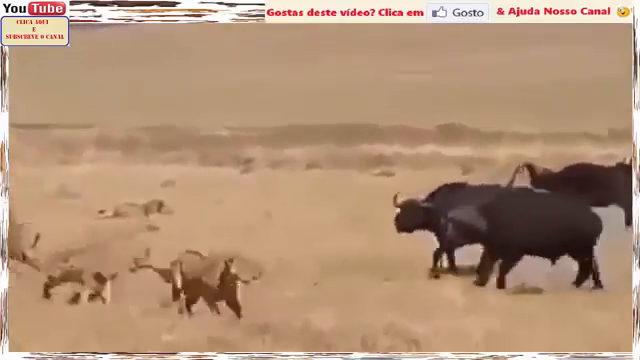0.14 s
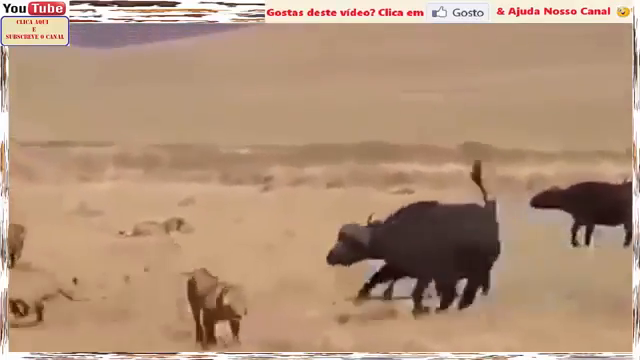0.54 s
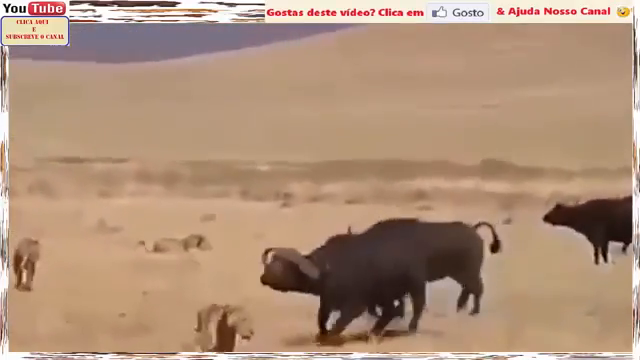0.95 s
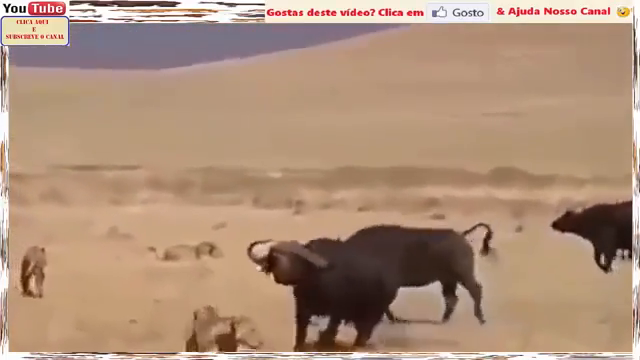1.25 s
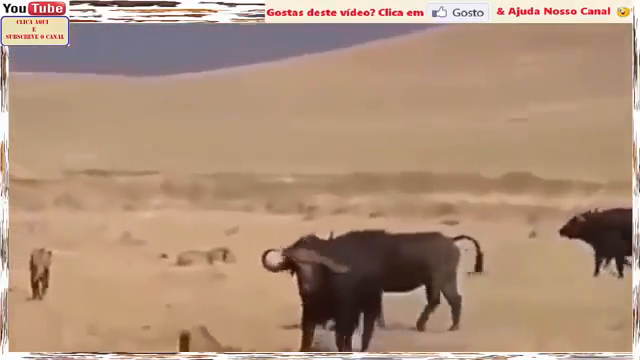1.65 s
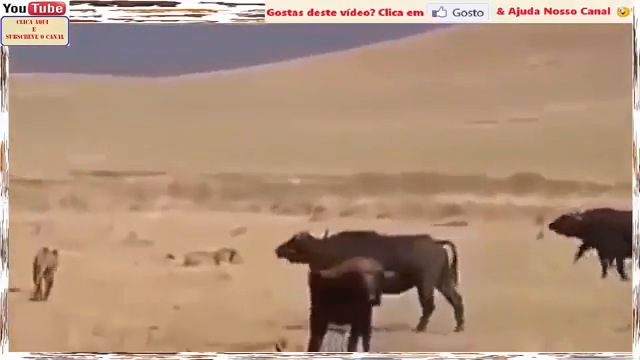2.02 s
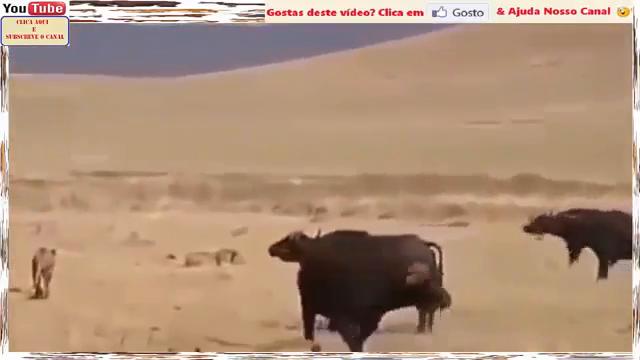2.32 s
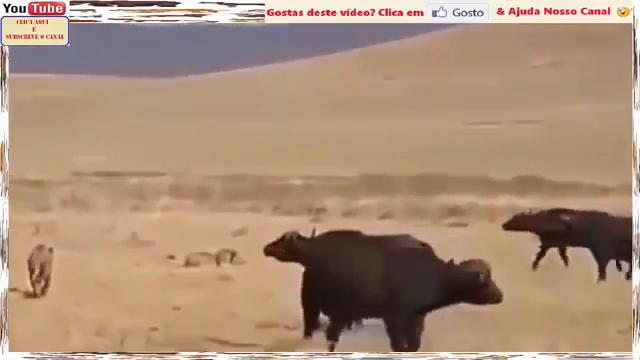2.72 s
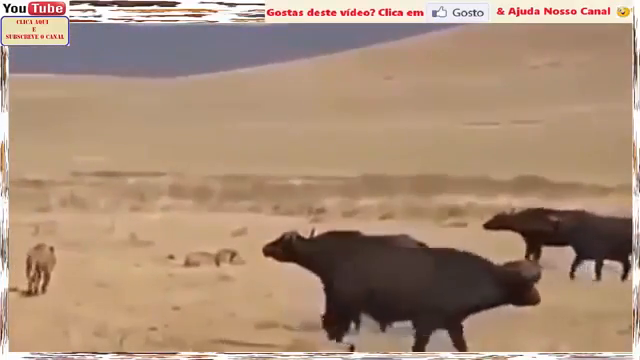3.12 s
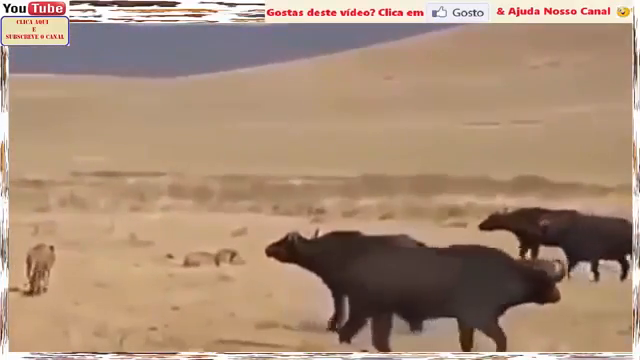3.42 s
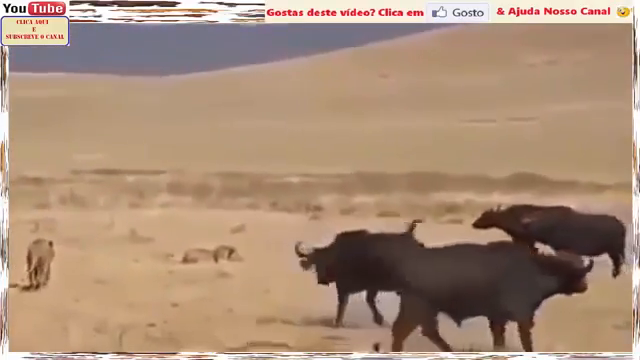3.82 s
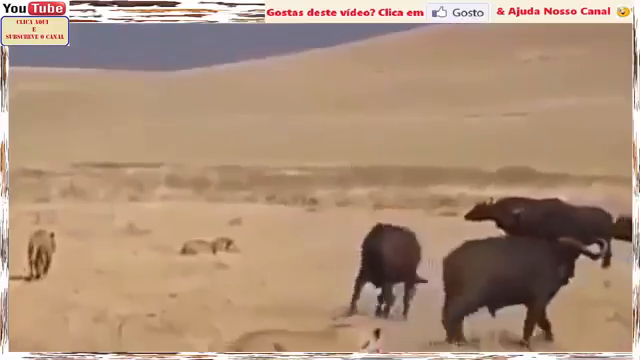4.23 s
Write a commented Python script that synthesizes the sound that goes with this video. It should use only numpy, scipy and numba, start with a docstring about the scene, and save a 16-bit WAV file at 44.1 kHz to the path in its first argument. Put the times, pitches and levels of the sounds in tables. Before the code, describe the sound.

A buffalo gives a long, hoarse low bellow with harsh rasps and a hollow knock, then a shorter, clearer call over rustling grass and hiss.

```python
"""Buffalo in dry grass on an open plain: a long hoarse low call, later a shorter clearer one.
Glottal pulses and breath ring in chest, throat, mouth and nose; harsh rasps and a hollow knock mix in.
Noise bands make the grass rustle, ground rumble, leg swishes and the hiss of the plain; hooves thud as
decaying sines. A small bird chirps twice and a far moan sags, both near sines; insects are thin noise bands.
"""
import sys
import numpy as np
from scipy import signal
from scipy.io import wavfile
from scipy.ndimage import uniform_filter1d
from numba import njit

SR = 44100
rng = np.random.default_rng(int(sys.argv[2]) if len(sys.argv) > 2 else 0)


def pcm_store(signal):
    """Save signal as 16-bit PCM."""
    levels = np.round(np.clip(np.atleast_2d(signal), -1, 1) * 32767)
    wavfile.write(sys.argv[1], SR, levels.astype(np.int16).T)


N = 192452


def from_db(db):
    """Gain of a level in dB."""
    return 10 ** (np.asarray(db) / 20)


def rms_one(x):
    """Signal scaled to unit rms."""
    return x / np.sqrt(np.mean(x ** 2) + 1e-20)


def in_time(rows):
    """Columns of a breakpoint table, one value per sample."""
    s, *columns = np.transpose(rows)
    return [np.interp(np.arange(N) / SR, s, c) for c in columns]


def at_hz(points, hz):
    """Value of a spectrum at a frequency, interpolated over log frequency."""
    points = np.array(points)
    return np.interp(np.log(hz), np.log(points[:, 0]), points[:, 1])


def drift(rate_hz):
    """Slow random wander of unit rms: low-passed noise, computed at every 40th sample."""
    r = np.exp(-80 * np.pi * rate_hz / SR)
    noise = rng.standard_normal(N // 40 + 2002)
    slow = signal.lfilter([1], [1, -2 * r, r * r], noise)[2000:]   # drop the filter's start-up
    return np.interp(np.arange(N) / 40, np.arange(len(slow)), rms_one(slow))


@njit
def resonate(x, turn, r):
    """Two-pole resonance whose centre (radians per sample) may move sample by sample."""
    y = np.zeros(len(x))
    for i in range(2, len(x)):
        drive = (1 - r * r) / 2 * (x[i] - x[i - 2])
        y[i] = drive + 2 * r * np.cos(turn[i]) * y[i - 1] - r * r * y[i - 2]
    return y


def mode(x, hz, width_hz):
    """One resonance with a peak gain of 1."""
    turn = 2 * np.pi * hz / SR * np.ones(len(x))
    return resonate(x + 1e-18, turn, np.exp(-np.pi * width_hz / SR))


def double_mode(x, hz, width_hz, second_width_hz):
    """Two resonances in series at one centre, for steeper skirts."""
    return mode(mode(x, hz, width_hz), hz, second_width_hz)


def evened(x):
    """Signal with its short-time level held at 1."""
    size = int(0.062 * SR)
    power = uniform_filter1d(uniform_filter1d(x ** 2, size=size), size=size)
    return x / np.sqrt(power + 1e-12)


def burst(s, length):
    """Smooth swell to a peak at s and a quicker fall."""
    t = np.arange(N) / SR - s
    return np.exp(-(t / (length * np.where(t < 0, 1, 0.71))) ** 2)


def rounded(start, length):
    """Rounded envelope: the square root of half a sine."""
    part = np.clip((np.arange(N) / SR - start) / length, 0, 1)
    return np.sqrt(np.abs(np.sin(np.pi * part)))


def whistle(start, length, hz, db):
    """A near sine with a slight tremble of level under a rounded envelope."""
    tone = np.sin(2 * np.pi * np.cumsum(hz) / SR)
    return from_db(db + 1.5 * drift(40)) * rounded(start, length) * tone


def glottal_pulses(cycles, pitch):
    """One click per cycle, scaled so that the power does not depend on pitch."""
    return np.diff(np.floor(cycles), prepend=0) * np.sqrt(SR / pitch)


def noise_bank(density):
    """Third-octave bands of stereo noise, each with its own level over time, flicker, likeness and balance."""
    # stereo likeness of the noise: f/Hz, correlation of left and right [0-1]
    likeness = [(60, 0.037), (170, 0.89), (470, 0.65), (1310, 0.32), (3670, 0.13), (10300, 0.016)]
    # stereo balance of the noise: f/Hz, left minus right/dB
    balance = [(30, 2), (60, -4.5), (170, 0), (470, -1), (1310, 2), (3670, -1), (10300, 5)]
    out, together = 0, drift(4)
    edges = 20 * 2 ** np.arange(0, 9.4, 1 / 3)
    white = rng.standard_normal((2, 2, N))   # neighbouring bands draw on different noise
    for k, (low, high) in enumerate(zip(edges, edges[1:])):
        band = signal.butter(2, [low, high], "band", fs=SR, output="sos")
        mid, side = signal.sosfilt(band, white[k % 2])
        hz = np.sqrt(low * high)
        alike, lean_db = np.clip(at_hz(likeness, hz), 0, 1), at_hz(balance, hz) / 2
        sides = np.sqrt(1 + alike) * mid + np.sqrt(1 - alike) * side * [[1], [-1]]
        flicker = 0.27 * together + 0.42 * drift(1.7) + drift(13.8) + 540 / (400 + hz) * drift(8.9)
        flicker_db = 2 * (1 + 45 / hz) * flicker
        out = out + density(hz) * from_db(flicker_db) * from_db([[lean_db], [-lean_db]]) * sides
    return out


def grass_and_ground():
    """Rustle and rumble follow the herd over the plain's hiss; each swish bursts around its own centre."""
    # herd in the grass: t/s, relative rustle level/dB, relative ground rumble level/dB
    herd = [(0.0, -32, -44.5), (0.3, -38.5, -40), (0.61, -38, -33.5), (0.92, -29.5, -36),
            (1.12, -21.5, -39), (1.42, -26.5, -28.5), (1.62, -18, -40), (1.88, -25.5, -38),
            (2.45, -26.5, -37.5), (2.6, -31.5, -35.5), (2.89, -29.5, -37), (3.23, -34, -40.5),
            (3.33, -30.5, -39), (3.55, -32.5, -36), (3.8, -30.5, -36), (3.96, -37.5, -47.5),
            (4.36, -43, -47)]
    # spectrum of the rustle: f/Hz, relative level per Hz/dB
    rustle = [(120, -44), (200, 0.5), (274, -2), (358, -34), (452, -5.5), (698, -4), (797, -6.5),
              (1110, -3.5), (1360, -7.5), (1740, -7.5), (7560, -11), (10700, -24), (13900, -4),
              (22000, -120)]
    # spectrum of the rumble: f/Hz, relative level per Hz/dB
    rumble = [(20, -12), (50, -8), (110, 3), (200, -9.5), (330, -3.5), (500, -43.5)]
    # spectrum of the plain's hiss: f/Hz, relative level per Hz/dB
    air = [(240, -45), (400, -3), (818, -32), (1090, -6.5), (1200, -34), (1950, -2), (9740, 2.5),
           (10700, 5.5), (13900, -20), (22000, -120)]
    # hiss over time: t/s, relative level/dB
    hiss = [(0, -41.5), (.9, -37.5), (2.9, -33.5), (3.6, -42.5), (4.36, -78)]
    # legs sweeping through stalks: peak t/s, relative level/dB, swell length/s, centre f/Hz, width/octaves
    swishes = [(1.661, -43, .05, 5000, 1.2), (1.723, -19.5, 0.08, 2390, 1.56),
               (1.866, -10, 0.038, 5900, 10.5), (2.106, -22, 0.12, 5660, 1.28),
               (2.266, -23, 0.039, 4050, 1.3), (2.401, -18.5, 0.043, 4000, 1.4),
               (2.434, -18.5, 0.046, 1780, 1.1), (2.613, -21.5, 0.066, 3720, 0.87),
               (2.748, -18.5, 0.01, 6450, 0.76), (2.759, -20.5, 0.022, 3600, 1.2),
               (2.878, -22.5, 0.081, 3720, 0.87), (2.887, -15, 0.023, 2940, 1),
               (3.192, -23.5, 0.073, 2480, 1.56), (3.43, -24, 0.072, 3200, 1.2),
               (3.502, -23.5, 0.016, 5230, 0.61), (3.617, -24.5, 0.017, 6600, 0.29)]
    rustle_db, rumble_db = in_time(herd)
    air_db, = in_time(hiss)
    crackle = from_db(drift(110))   # stalks snap in clumps
    bursts = []
    for s, db, length, centre, octaves in swishes:
        bursts.append((from_db(2 * db) * burst(s, length) * crackle, centre, octaves))

    def density(hz):
        """Powers per Hz of the causes add; the offsets spread each overall level over its spectrum."""
        power = from_db(2 * (rustle_db + at_hz(rustle, hz) + 11))
        power = power + from_db(2 * (rumble_db + at_hz(rumble, hz) + 19.5))
        power = power + from_db(2 * (air_db + at_hz(air, hz) + 7.5))
        for swish, centre, octaves in bursts:
            shape = np.exp(-(np.log2(hz / centre) / octaves) ** 2)
            power = power + swish * 9000 / (centre * octaves) * shape
        return np.sqrt(power)
    return noise_bank(density)


def insects():
    """Stridulation as thin resonant bands of noise that fade away; louder on the left."""
    # stridulation bands: f/Hz, width/Hz, starting level before the pan/dB
    bands = [(8950, 74, -69), (9300, 210, -41.5)]
    out = 0
    for hz, width, db in bands:
        out = out + from_db(db) * rms_one(double_mode(rng.standard_normal(N), hz, width, width))
    fade_db_per_s = -10
    return out * from_db(fade_db_per_s * np.arange(N) / SR) * from_db([[2], [-8]])


def moan():
    """A faint moan from farther off: a near sine whose pitch sags and lifts again."""
    # pitch and level of the moan: t/s, f/Hz, relative level/dB
    glide = [(.19, 272, -60), (0.231, 269.5, -40), (.42, 261.5, -42), (.49, 234, -55), (.55, 216, -41),
             (.62, 262, -43), (.66, 270, -60)]
    hz, db = in_time(glide)
    return whistle(glide[0][0], glide[-1][0] - glide[0][0], hz, db + 3.5)


def bird():
    """Each chirp is a slightly unsteady whistle whose pitch falls and levels out."""
    # chirps: start t/s, start f/Hz, level/dB
    chirps = [(.243, 4650, -35), (.513, 4900, -32)]
    end_hz, wobble_hz, fall_s, length_s = 3340, 70, 0.036, 0.098
    t, out = np.arange(N) / SR, 0
    for s, start_hz, db in chirps:
        fall = (start_hz - end_hz) * np.exp(-((t - s) / fall_s) ** 2)
        out = out + whistle(s, length_s, end_hz + fall + wobble_hz * drift(110), db)
    return out


def hooves():
    """Each landing is a soft low push, a decaying sine, that also rings the dry soil."""
    # hoof landings: t/s, level of the push/dB, f/Hz
    thuds = [(0.269, -36, 85.5), (0.453, -26, 76.5), (0.535, -25, 64.6), (0.658, -12.5, 118),
             (0.718, -21, 103), (1.013, -25, 101), (1.429, -12.5, 214), (1.45, -30, 55),
             (1.65, -16.5, 67.55), (1.75, -20, 70), (2.131, -28, 55.3), (2.599, -23, 95.5),
             (2.708, -24.5, 210), (2.999, -31, 51.5), (3.08, -24, 284)]
    # hollow ring of the soil: f/Hz, level against the push/dB, 60 dB decay time/s
    soil_hz, soil_db, soil_t60 = (304, -7.5, 0.24)
    cycles_per_20_db = 5.4   # cycles in which the push falls by 20 dB
    out, t = np.zeros(N), np.arange(SR // 4) / SR
    ring = from_db(soil_db - 60 * t / soil_t60) * np.sin(2 * np.pi * soil_hz * t)
    onset = 1 - np.exp(-t / 0.00018)
    for s, db, hz in thuds:
        push = np.sin(2 * np.pi * hz * t) * from_db(-20 * t * hz / cycles_per_20_db)
        i = round(s * SR)
        out[i:i + len(t)] += from_db(db) * (push + ring) * onset
    return out


def call(rows, voice_type, rough, jitter, pulse_s, attack_s, chest_opens, chest_follows, nasal):
    """Uneven glottal pulses and breath gated by each cycle ring in the body; turbulent breath roars."""
    # broad modes of the roaring breath: f/Hz, width/Hz, relative level/dB
    roar_modes = [(135, 25, -12), (530, 420, 5), (1070, 110, 3), (2200, 280, -3), (2820, 300, 2)]
    # lowest partials under the chest: f/Hz, width/Hz, level against the chest/dB
    low_hz, low_width, low_db = (17, 173, -17.5)
    # nasal branch: mode f/Hz, width/Hz, level against the chest/dB, notch f/Hz, notch width/Hz
    nose_hz, nose_width, nose_db, notch_hz, notch_width = (403, 50, -13.5, 535, 105)
    upper_hz, upper_width = 1518, 255   # second mouth mode
    pitch, chest_db, throat_db, mouth_db, upper_db, throat_hz, mouth_hz = in_time(rows)
    chest_hz, chest_width, throat_width, mouth_width, roar_db = voice_type
    t, start, end = np.arange(N) / SR, rows[0][0], rows[-1][0]

    # the chest leans to the third partial and may start lower
    chest_hz = chest_hz + chest_follows * (3 * pitch - chest_hz)
    drop, open_s = chest_opens
    chest_hz = chest_hz * (1 - drop * np.exp(-(np.clip(t - start, 0, None) / open_s) ** 2))

    cycles = np.cumsum(pitch * (1 + jitter * drift(40))) / SR
    cycles -= cycles[round(pulse_s * SR)]   # a pulse falls on this moment
    pulses = glottal_pulses(cycles, pitch) * from_db(2.2 * rough * drift(150))
    breath = rng.standard_normal(N) * np.exp(-2.5 * (cycles % 1)) * 14.5
    smooth = pulses + 0.33 * rough * breath   # the lows stay voiced
    hoarse = np.sqrt(1 - rough ** 2) * pulses + rough * breath

    chest = double_mode(smooth, chest_hz, chest_width, 2 * chest_width)
    throat = double_mode(smooth, throat_hz, throat_width, 5.7 * throat_width)
    mouth = double_mode((smooth + hoarse) / 2, mouth_hz, mouth_width, 2.3 * mouth_width)
    upper = double_mode(hoarse, upper_hz, upper_width, 2 * upper_width)
    undertone = double_mode(smooth, low_hz, low_width, low_width)
    nose = double_mode(smooth, nose_hz, nose_width, nose_width)

    # partly separate breath noise left and right makes the roar wide above the bass
    air = rng.standard_normal((3, N))
    wide_air = air[0] + 0.5 * signal.lfilter([1, -1], [1, -0.95], air[1:])
    rush = wide_air * np.exp(-1.1 * (cycles % 1)) + 0.2 * pulses   # turbulence only lightly pulsed
    roar = 0
    for k, (hz, width, db) in enumerate(roar_modes):
        roar = roar + (-1) ** k * from_db(db) * np.array([mode(side, hz, width) for side in rush])

    voice = from_db(chest_db) * evened(chest) + from_db(throat_db) * evened(throat)
    voice += from_db(mouth_db) * evened(mouth) + from_db(upper_db) * evened(upper)
    voice += from_db(chest_db + low_db) * evened(undertone)
    voice += from_db(chest_db + nose_db) * evened(nose)
    voice = voice + from_db(mouth_db + roar_db) * rms_one(roar)
    voice -= nasal * np.array([mode(side, notch_hz, notch_width) for side in voice])
    return voice * np.clip(np.minimum((t - start) / attack_s, (end - t) / 0.0096), 0, 1)


def long_call():
    """Long hoarse low call; the chest starts closed and low, then opens."""
    # t/s, pitch f/Hz, chest, throat, mouth and upper mouth level/dB, throat f/Hz, mouth f/Hz
    rows = [(0.8, 58.6, -42, -49, -59, -70, 790, 1280), (0.844, 70.6, -24, -62, -47, -50, 790, 1360),
            (0.882, 84.1, -20.5, -27, -24.5, -27, 830, 1360),
            (0.918, 95.75, -20.5, -25.5, -35, -34, 790, 1405),
            (0.95, 89.8, -15.5, -29, -26.5, -34, 820, 1326),
            (1.028, 75.97, -31, -29, -23.5, -20, 820, 1360), (1.06, 75.4, -9.5, -36, -29, -30, 800, 1290),
            (1.1, 83.4, -14.5, -21, -22.5, -26, 790, 1305),
            (1.155, 87.57, -17.5, -26.5, -22.5, -22, 775, 1350),
            (1.226, 99.16, -13, -23.5, -21.5, -36, 800, 1377),
            (1.285, 98.43, -18, -26, -23.5, -25, 807, 1330), (1.31, 100.9, -13.5, -20, -28, -32, 805, 1410),
            (1.37, 112.5, -16.5, -17, -33, -12, 760, 1320),
            (1.43, 115.9, -18, -11.5, -15.5, -21, 807, 1332),
            (1.49, 99.1, -22.5, -14.5, -28, -34, 800, 1320), (1.542, 95.4, -20.5, -25, -46, -31, 760, 1250),
            (1.618, 79.48, -15, -30, -35, -28, 836, 1531), (1.67, 80.13, -7.5, -25, -26.5, -29, 823, 1416),
            (1.705, 82, -12.5, -26, -23, -19, 840, 1347), (1.73, 72.7, -22.5, -42, -23, -25, 800, 1314),
            (1.786, 71.86, -16.5, -23.5, -29, -45, 810, 1190),
            (1.848, 74.1, -27.5, -24.5, -37, -55, 839, 1300),
            (1.958, 72.3, -41, -26.5, -43, -57, 810, 1299), (2.03, 70, -55, -59, -64, -65, 815, 1336)]
    # voice: chest f/Hz, chest, throat and mouth width/Hz, roar level against the mouth/dB
    voice_type = (253, 48.5, 34, 60, 3)
    # opening of the chest: starting drop [share of its f], opening time/s
    chest_opens = (0.4, 0.11)
    return call(rows, voice_type, rough=0.28, jitter=0.006, pulse_s=0.88, attack_s=0.08,
                chest_opens=chest_opens, chest_follows=0.28, nasal=0.1)


def short_call():
    """Shorter clearer call: less breath and roar, and a full nasal notch."""
    # t/s, pitch f/Hz, chest, throat, mouth and upper mouth level/dB, throat f/Hz, mouth f/Hz
    rows = [(3.37, 98, -39, -37, -42, -40, 859, 1310), (3.398, 100, -29, -32, -33, -29, 855, 1310),
            (3.4025, 100.5, -19, -23, -23, -16, 850, 1310), (3.418, 101, -16, -25, -22, -18, 880, 1290),
            (3.434, 101.5, -14.5, -31, -21, -17, 930, 1230),
            (3.45, 103.1, -23.5, -22.5, -19.5, -35, 890, 1230),
            (3.474, 112.2, -31, -23, -13, -25, 926, 1294), (3.49, 116.1, -25.5, -23, -24, -30, 920, 1260),
            (3.528, 119.7, -31.5, -28.5, -28, -37, 954, 1260),
            (3.566, 124.2, -33, -31, -36, -41, 960, 1340), (3.596, 137.6, -25.5, -21, -22, -23, 960, 1330),
            (3.62, 137.8, -43, -30, -18, -22, 926, 1330), (3.638, 141.3, -24, -24, -25, -19.5, 950, 1260),
            (3.662, 143, -24, -18.5, -23, -20, 916, 1250),
            (3.688, 136.1, -24.5, -16, -16, -18.5, 940, 1200),
            (3.714, 125.9, -29, -25, -23, -22.5, 930, 1230), (3.746, 130, -24, -22, -15.5, -22, 900, 1216),
            (3.78, 117.9, -38, -22.5, -17, -26, 907, 1200), (3.816, 120.2, -38, -30, -19.5, -23, 943, 1180),
            (3.854, 128.6, -36, -28, -19, -22, 950, 1293), (3.874, 132.7, -34, -27, -16, -38, 935, 1300),
            (3.912, 133.2, -31, -36, -22.5, -41, 950, 1273), (3.94, 134, -31, -27, -25, -35, 930, 1300),
            (3.964, 136.9, -32, -30, -23, -25, 940, 1300), (3.99, 137.5, -33, -33, -22, -23, 926, 1290),
            (4.05, 134.4, -34.5, -34, -23, -27, 840, 1215), (4.078, 133.6, -44, -29, -32, -34.5, 876, 1210),
            (4.108, 133.3, -37, -42, -30, -33, 897, 1218), (4.142, 125.5, -40, -36, -26, -34, 920, 1220),
            (4.178, 116.8, -53, -36, -35, -35, 920, 1240), (4.22, 117, -34, -35, -29.5, -28, 916, 1222),
            (4.248, 110.6, -32, -41, -31, -33, 880, 1260), (4.272, 104.9, -27, -39, -42, -30, 873, 1230),
            (4.294, 106.0, -38, -50, -46, -43, 869, 1238), (4.31, 106.9, -47, -55, -63, -59, 870, 1247)]
    # voice: chest f/Hz, chest, throat and mouth width/Hz, roar level against the mouth/dB
    voice_type = (291, 46, 93, 65, -12)
    # roughness: t/s, share of breath [0-1]
    roughness = [(3.37, .2), (3.5, .2), (3.58, .1), (3.69, .1), (3.72, .24), (3.76, .2), (3.79, .07),
                 (4.04, .06), (4.08, .22), (4.31, .18)]
    return call(rows, voice_type, rough=in_time(roughness)[0], jitter=0.003, pulse_s=3.4015,
                attack_s=0.03, chest_opens=(0, 1), chest_follows=0, nasal=1)


def widening(voice):
    """Brighter delayed copies of the voice, inverted on the right, which widen it."""
    # delayed copies: delay t/s, left level/dB, right level/dB
    copies = [(.0043, -11, -20), (.0071, -13.5, -21.5), (.023, -14, -14.5), (0.046, -13, -30)]
    bright = signal.sosfilt(signal.butter(1, 600, "high", fs=SR, output="sos"), voice)
    out = np.zeros_like(voice)
    for s, left_db, right_db in copies:
        gains = from_db([[left_db], [right_db]]) * [[1], [-1]]
        out += gains * np.roll(bright, round(s * SR), axis=1)
    return out


def knock():
    """One blow on something hollow: a handful of short decaying modes."""
    # modes of the hollow body: f/Hz, relative level/dB, 60 dB decay time/s
    modes = [(280, 1.5, 0.06), (656, -7.5, 0.081), (773, -5, 0.053), (990, -1, 0.041), (1430, -11, 0.068),
             (1840, -21, 0.035)]
    knock_s, knock_db = 1.013, -6
    t = np.clip(np.arange(N) / SR - knock_s, 0, None)
    out = 0
    for hz, db, t60 in modes:
        out = out + from_db(knock_db + db - 60 * t / t60) * np.sin(2 * np.pi * hz * t)
    return out


def rasps():
    """A higher, harsher voice: fast pulses with some breath, each swell in a broad resonance of its own."""
    # pulse rate: t/s, f/Hz
    pulse_rate = [(1.32, 220), (1.378, 224), (1.4, 237), (1.43, 241), (1.46, 232), (1.494, 219),
                  (1.53, 206), (1.64, 160), (1.68, 160), (1.71, 199), (1.76, 200)]
    # swells over the long call: peak t/s, level/dB, swell length/s, centre f/Hz
    swells = [(1.364, -18, 0.042, 1140), (1.369, -17.5, 0.031, 1690), (1.413, -39, .03, 2130),
              (1.443, -13, .04, 1085), (1.44, -19, 0.063, 1680), (1.48, -22, 0.11, 2170),
              (1.67, -16.5, 0.014, 890), (1.734, -14, 0.026, 1260), (1.735, -21, 0.044, 1930)]
    # fundamental of the rasping voice: start t/s, length/s, peak level/dB
    tone_s, tone_length, tone_db = (1.33, 0.15, -10.5)
    jitter, breath, width_hz = 0.014, 0.4, 271
    pitch, = in_time(pulse_rate)
    cycles = np.cumsum(pitch * (1 + jitter * drift(40))) / SR
    source = glottal_pulses(cycles, pitch) + breath * rng.standard_normal(N)
    out = from_db(tone_db) * rounded(tone_s, tone_length) * np.sin(2 * np.pi * cycles)
    for s, db, length, hz in swells:
        ringing = rms_one(double_mode(source, hz, width_hz, 2 * width_hz))
        out = out + from_db(db) * burst(s, length) * ringing
    return out


def scene():
    """All sources together; only the calls and rasps are widened."""
    voice = long_call() + short_call() + rasps()
    surroundings = grass_and_ground() + insects() + moan() + bird() + hooves()
    return surroundings + voice + widening(voice) + knock()


def record(dry):
    """Peaks clip at full scale, then a steep low-pass cuts the top above 10.8 kHz."""
    low_pass = signal.ellip(12, 0.5, 75, 10800, fs=SR, output="sos")
    return signal.sosfilt(low_pass, np.clip(dry, -1, 1))


dry = scene()
out = record(dry)
pcm_store(out)
```